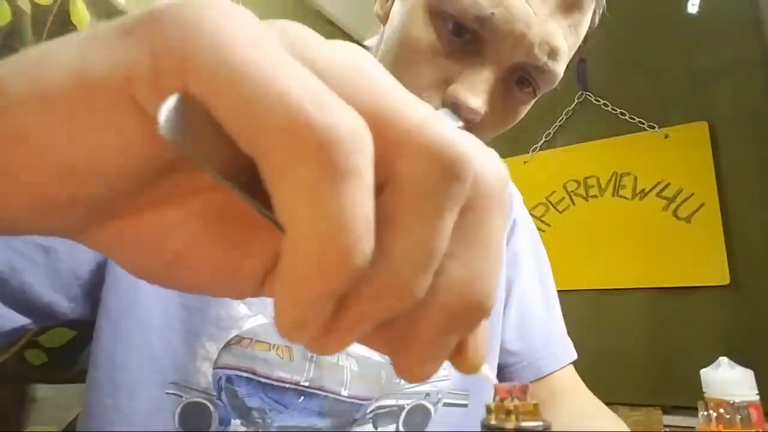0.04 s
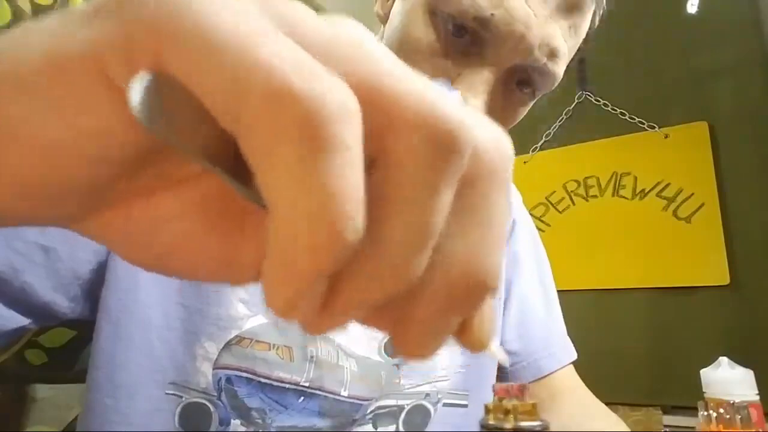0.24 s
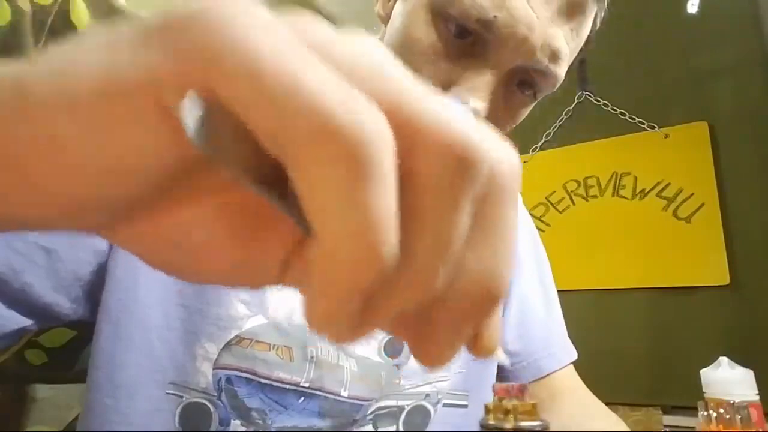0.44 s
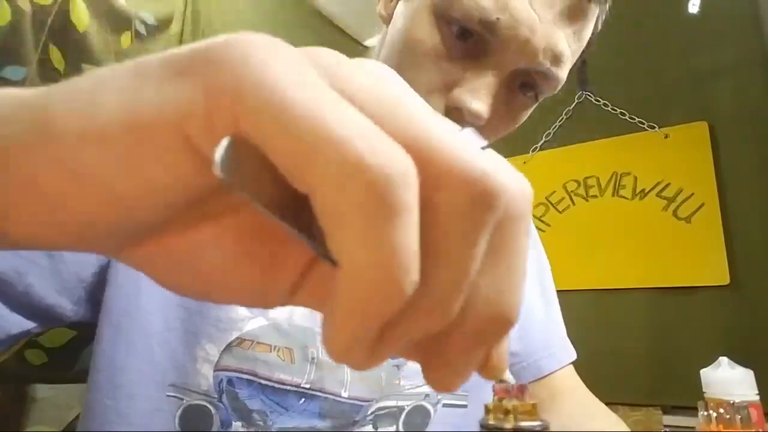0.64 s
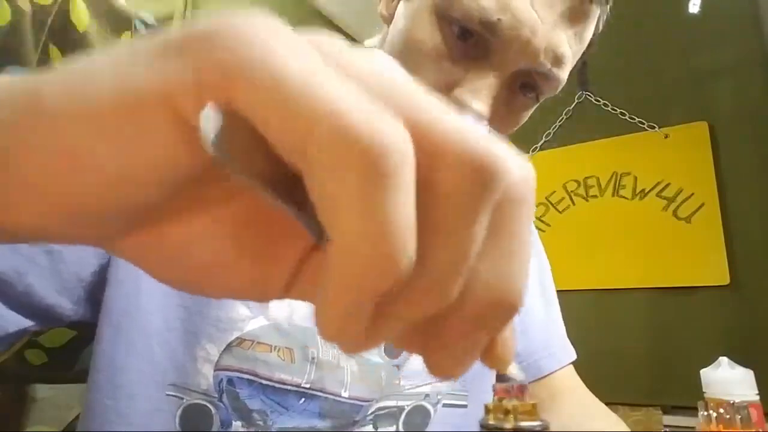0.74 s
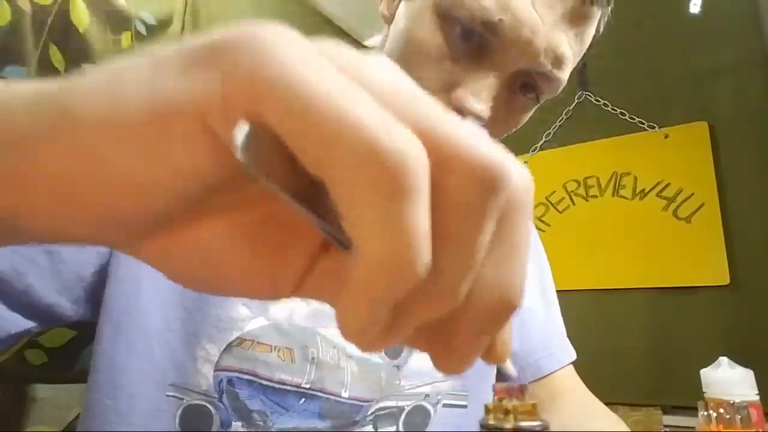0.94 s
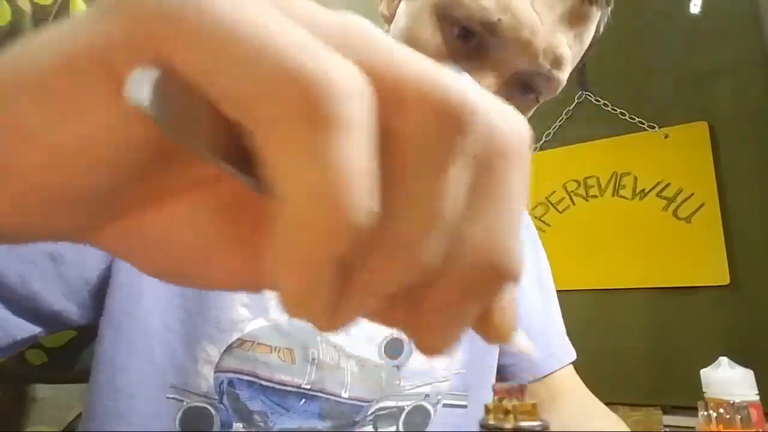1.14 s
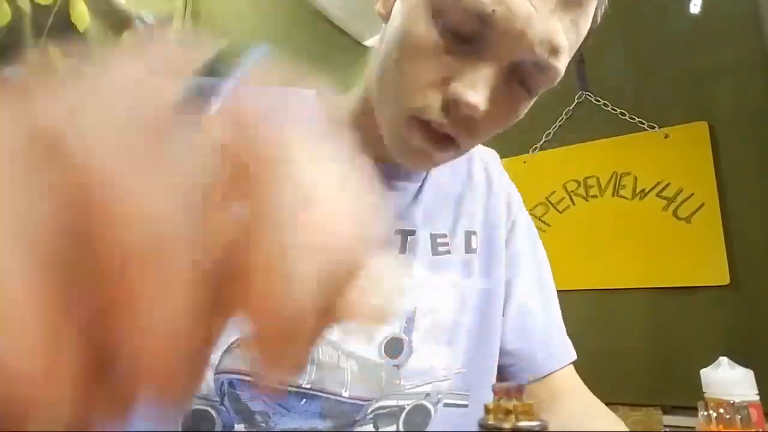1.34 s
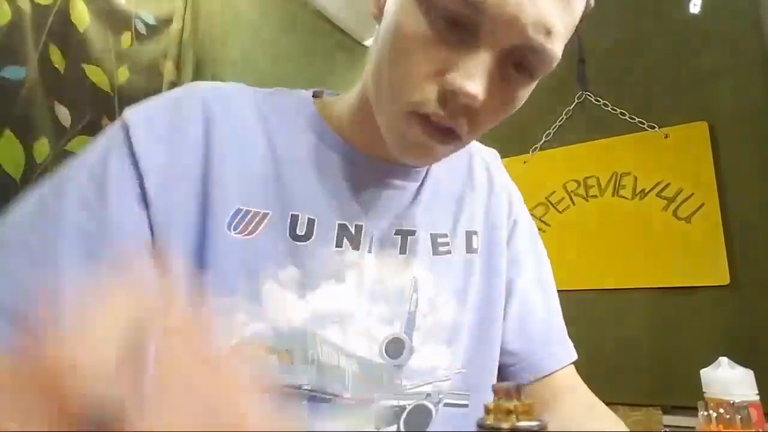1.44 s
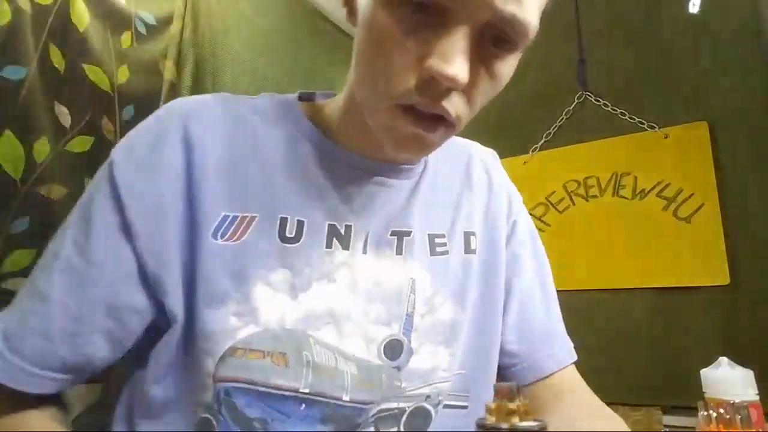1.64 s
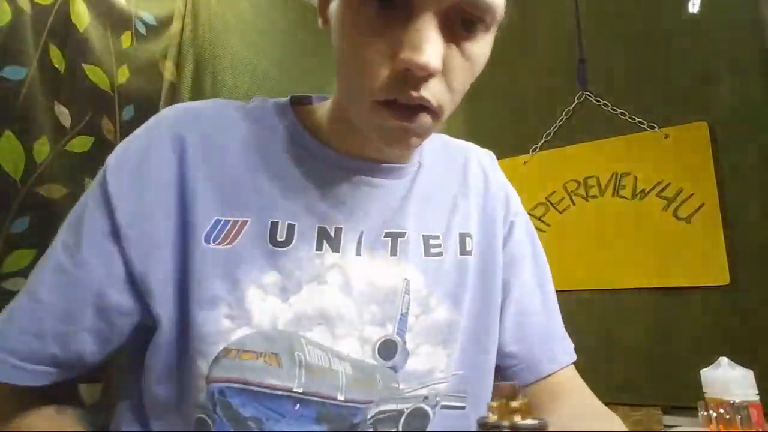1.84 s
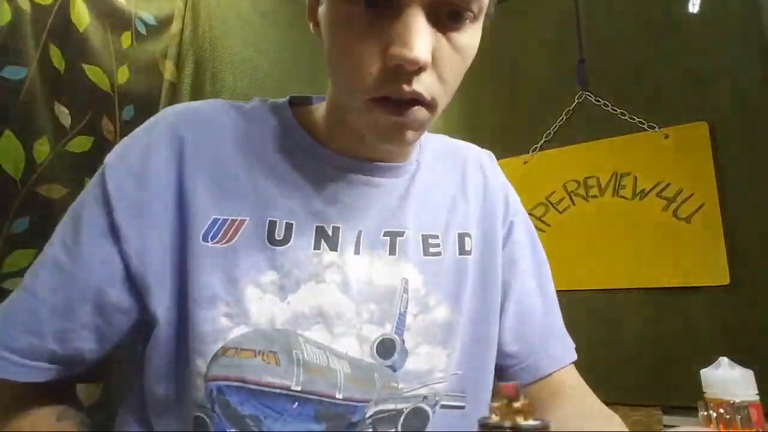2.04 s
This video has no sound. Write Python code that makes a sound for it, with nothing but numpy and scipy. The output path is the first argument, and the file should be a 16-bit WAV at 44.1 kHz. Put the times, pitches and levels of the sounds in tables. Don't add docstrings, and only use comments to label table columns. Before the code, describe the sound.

Hand knocks on a wooden desk over a faint steady fan hum and light hiss. A strong dull double thump with a gritty scrape comes at 0.2 s, lighter knocks and scratches around 0.7-0.77 s, a rattling cluster at 1.04 s. A sleeve rustles with slight rumble near 1.55 s, a thud follows at 1.63 s, tweezers click sharply at 1.8 s, then a faint tap at 1.9 s. Small dry room, close microphone.

```python
import sys
import numpy as np
from scipy import signal
from scipy.fft import rfft, irfft, next_fast_len
from scipy.io import wavfile
from scipy.ndimage import uniform_filter1d

SR = 44100
rng = np.random.default_rng(int(sys.argv[2]) if len(sys.argv) > 2 else 0)


def amplitude_ratio(level_db):
    exponent = np.asarray(level_db, float) / 20
    return 10 ** exponent


def to_wav(sig):
    pcm = np.clip(np.atleast_2d(sig), -1, 1) * 32767
    pcm = np.round(pcm).astype(np.int16)
    wavfile.write(sys.argv[1], SR, pcm.T)


N = 92610

# (frequency [Hz], level [dB], t60 [s])
DESK_MODES = [(136.7, 1.5, 0.24), (165, -4, 0.15), (208.6, -7.5, 0.19), (252, 0, 0.063), (315, -0.5, .075),
              (370, -6, 0.081), (431.7, -2, 0.11), (567, -5.5, 0.082), (708, -3, 0.029), (800, -2, 0.048),
              (976, -9, 0.037), (1233, 0, 0.037), (1600, -4.5, 0.035), (2240, -4, 0.048)]


def unit(x):
    return x / np.sqrt(np.mean(x ** 2))


def colour(x, points):
    hz, db = np.array(points, float).T
    size = next_fast_len(len(x))
    f = np.arange(size // 2 + 1) * SR / size + 1
    gain = amplitude_ratio(np.interp(np.log(f), np.log(hz), db))
    return irfft(rfft(x, size) * gain, size)[:len(x)]


def mode(x, hz, t60_s):
    r = np.exp(-np.log(1000) / (max(t60_s, 0.005) * SR))
    w = 2 * np.pi * hz / SR
    return signal.lfilter([0, r * np.sin(w)], [1, -2 * r * np.cos(w), r * r], x)


def walk(rate_hz):
    hold = int(SR / rate_hz)
    steps = np.repeat(rng.standard_normal(N // hold + 1), hold)
    smooth = uniform_filter1d(uniform_filter1d(steps, hold), hold)
    return unit(smooth[:N])


def strikes(times_s, gains):
    x = np.zeros(N)
    np.add.at(x, (np.asarray(times_s) * SR).astype(int), gains)
    return x


def cut_lows(x, hz, order=4):
    return signal.sosfilt(signal.butter(order, hz, "high", fs=SR, output="sos"), x)


def favour(hz, centre_hz, octaves):
    return np.exp(-0.5 * (np.log2(hz / centre_hz) / octaves) ** 2)


def room_air():
    # (frequency [Hz], density [dB per Hz])
    air_spectrum = [(30, -40), (62, -13), (140, -10), (200, -14.5), (330, -12), (520, -21.5), (1900, -26),
                    (11000, -45.5)]
    air = colour(rng.standard_normal(N), [*air_spectrum, (14000, -53)])
    return amplitude_ratio(-67 + 1.0 * walk(3.7)) * unit(air)


def fan():
    # (frequency [Hz], width [Hz], level [dB])
    noise_bands = [(70.5, 8.3, -87), (320.6, 7.3, -71), (1704, 81, -83.5), (1972, 140, -86.5),
                   (8170, 900, -90)]
    out = 0
    for hz, width_hz, db in noise_bands:
        t60_s = np.log(1000) / np.pi / width_hz
        level = amplitude_ratio(db + 3.9 * walk(8.85))
        out = out + level * unit(mode(rng.standard_normal(N), hz, t60_s))
    return out


def microphone_hiss():
    hiss = cut_lows(rng.standard_normal(N), 11560, order=8)
    return amplitude_ratio(-73.5 + 0.5 * walk(4.5)) * hiss / np.std(hiss)


def scrapes():
    # (start [s], length [s], desk level [dB], favoured frequency [Hz], grit level [dB])
    scrape_events = [(0.05, 0.013, -70.5, 1600, -72.5), (0.189, 0.0064, -71, 900, -57),
                     (.202, 0.0089, -42.5, 1310, -45), (0.216, 0.016, -56.5, 1500, -58),
                     (0.262, 0.162, -72, 800, -82), (0.688, 0.026, -65, 477, -68.5),
                     (0.726, 0.031, -56, 1310, -63), (0.75, 0.03, -59.5, 1470, -56),
                     (0.768, 0.028, -59, 1990, -74), (1.034, 0.0093, -58, 900, -54),
                     (1.041, 0.023, -46, 1130, -46.5), (1.085, 0.013, -67, 900, -74),
                     (1.4, 0.093, -75.5, 595, -79), (1.797, 0.026, -70, 1700, -76)]
    # (frequency [Hz], gain [dB])
    grit_spectrum = [(2600, 2), (5000, -10), (7700, -7), (8600, -11.5), (9300, -15), (11000, -9),
                     (13500, -0.5), (15800, 0)]
    spread_oct, damping, grain_db = 0.64, 0.34, 3.0
    rise_share, tail_s = 0.15, 0.0058

    start_s, length_s, desk_db, centre_hz, grit_db = np.array(scrape_events).T
    uneven = amplitude_ratio(grain_db * rng.exponential(size=N)) * amplitude_ratio(3.06 * walk(250))
    grains = unit(rng.standard_normal(N) * uneven)

    since_s = np.arange(N) / SR - start_s[:, None]
    rise = np.clip(since_s / (rise_share * length_s[:, None]), 0, 1)
    fall = np.exp(-np.clip(since_s - length_s[:, None], 0, None) / tail_s)
    shape = rise * fall

    wood = 0
    for hz, db, t60_s in DESK_MODES:
        damped_s = t60_s * damping
        push = (amplitude_ratio(desk_db + db) * favour(hz, centre_hz, spread_oct)) @ shape
        even_out = np.sqrt(14 / (damped_s * SR))
        wood = wood + mode(grains * push, hz, damped_s) * even_out
    grit = colour(grains * (amplitude_ratio(grit_db) @ shape), [(500, -62), *grit_spectrum])
    return wood + 2 * grit


def knocks():
    # (time [s], level [dB], favoured frequency [Hz], spread [octaves])
    knock_events = [(0.056, -64.5, 497, 1.5), (.072, -54.5, 219, 0.5), (0.093, -66, 300, 0.4),
                    (.193, -50, 395, 1.13), (0.2026, -41.5, 1300, 1.3), (.205, -32, 280, 0.68),
                    (.211, -31, 233, 0.97), (.218, -41, 150, 0.13), (.225, -38.5, 150, 0.58),
                    (0.255, -40, 173, 1), (0.7, -49, 283, 0.5), (.722, -61, 154, 0.77),
                    (.7665, -37, 596, 0.26), (.7725, -47, 613, 0.32), (1.036, -44.5, 574, 0.99),
                    (1.040, -39.5, 610, 0.53), (1.048, -37.5, 1010, 0.53), (1.054, -50.5, 199, 1.46),
                    (1.062, -45.5, 590, 0.89), (1.43, -56.5, 326, 0.39), (1.63, -36.5, 370, 0.61),
                    (1.642, -49.5, 300, 1.11), (1.676, -57, 169, 0.88), (1.891, -48.5, 590, 0.25),
                    (1.362, -67, 300, 0.55), (.699, -70, 1200, 1.3)]
    contact_turns, scatter_db = 0.79, 1.5
    time_s, level_db, centre_hz, spread_oct = np.array(knock_events).T
    chance = rng.standard_normal((len(time_s), len(DESK_MODES)))
    out = 0
    for k, (hz, db, t60_s) in enumerate(DESK_MODES):
        gains = amplitude_ratio(level_db + db + scatter_db * chance[:, k]) * favour(hz, centre_hz, spread_oct)
        push = np.hanning(int(contact_turns * SR / hz))
        force = signal.fftconvolve(strikes(time_s, gains), 2 * push / push.sum())[:N]
        out = out + (-1) ** k * mode(force, hz, t60_s)
    return out


def sleeve():
    # (time [s], level [dB])
    drag = [
        (1.49, -75),
        (1.526, -52),
        (1.561, -52),
        (1.601, -66.5),
        (1.63, -77),
    ]
    # (frequency [Hz], gain [dB])
    cloth_spectrum = [(150, -3.5), (300, 4), (500, -1.5), (800, 3), (1200, -10), (2100, -13.5),
                      (3500, -26.5), (6000, -35)]
    time_s, level_db = np.array(drag).T
    fibres = rng.standard_normal(N) * amplitude_ratio(2.2 * walk(120))
    rustle = unit(colour(fibres, [(40, -58), *cloth_spectrum]))
    return rustle * amplitude_ratio(np.interp(np.arange(N) / SR, time_s, level_db, left=-120, right=-120))


def arm_sweep():
    centre_s, spread_s = 1.585, 0.041
    t = np.arange(N) / SR
    rumble = unit(mode(rng.standard_normal(N), 65, 0.055))
    return amplitude_ratio(-62.5) * rumble * np.exp(-0.5 * ((t - centre_s) / spread_s) ** 2)


def tweezers():
    # (frequency [Hz], level [dB], t60 [s])
    steel_modes = [(1530, -7, 0.014), (1750, 8.5, 0.025), (2275, 4.5, 0.022), (4021, -3.5, 0.022),
                   (5529, 5, 0.014), (7900, 5, 0.028), (8145, -6, 0.032), (9800, -2, 0.023),
                   (11200, -1, .025), (12030, -19, .025), (13450, 0, 0.017), (14940, -8, .025)]
    # (time [s], ring level [dB], crack level [dB])
    touches = [
        (1.797, -61, -59),
        (1.8016, -54, -33),
        (1.8024, -41.5, -40),
        (1.806, -53, -39),
        (1.811, -64, -41),
        (1.818, -71, -52),
    ]
    scatter_db, crack_s = 1.5, 0.001
    time_s, ring_db, crack_db = np.array(touches).T
    chance = rng.standard_normal((len(time_s), len(steel_modes)))
    ring = 0
    for k, (hz, db, t60_s) in enumerate(steel_modes):
        gains = amplitude_ratio(ring_db + db + scatter_db * chance[:, k])
        ring = ring + mode(strikes(time_s, gains), hz, t60_s)
    decay = np.exp(-1 / (crack_s * SR))
    burst = signal.lfilter([1], [1, -decay], strikes(time_s, amplitude_ratio(crack_db)))
    crack = colour(burst * rng.standard_normal(N), [(400, -38), (1000, -5), (2000, 8.5), (3500, 1.5),
                                                    (8000, 6.5), (9300, -3), (12000, 5.5)])
    return ring + crack


def room(x):
    # (frequency [Hz], gain [dB])
    tail_spectrum = [(150, -14.5), (500, 1.5), (2000, 1.5), (5500, -5.5), (8100, 2.5), (9300, -3),
                     (11000, -4), (16000, -3.5)]
    t60_s, tail_db, gap_s = 0.14, -9.5, 0.00391
    t = np.arange(SR // 3) / SR
    tail = rng.standard_normal(len(t)) * amplitude_ratio(-60 * t / t60_s) * (t > gap_s)
    tail = colour(tail / np.sqrt(np.sum(tail ** 2)), tail_spectrum)
    return x + amplitude_ratio(tail_db) * signal.fftconvolve(x, tail)[:N]


def scene():
    floor = room_air() + fan() + microphone_hiss()
    desk = cut_lows(scrapes() + knocks(), 82.6)
    handling = desk + sleeve() + cut_lows(tweezers(), 890)
    return (room(handling) + floor + arm_sweep())[None]


def top_cut(x):
    return signal.sosfilt(signal.butter(12, 16990, fs=SR, output="sos"), x)


def record(dry):
    low_pass = signal.ellip(8, 0.3, 45, 15850, fs=SR, output="sos")
    mix = signal.sosfilt(low_pass, dry)
    return top_cut(mix)


dry = scene()
out = record(dry)
to_wav(out)
```